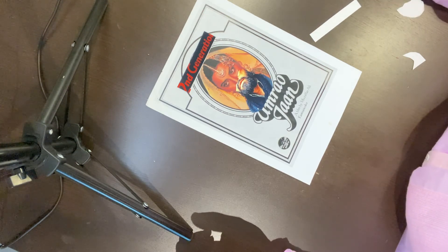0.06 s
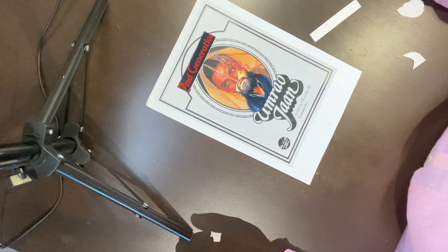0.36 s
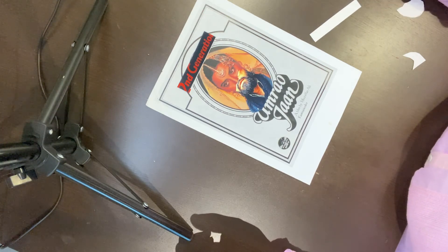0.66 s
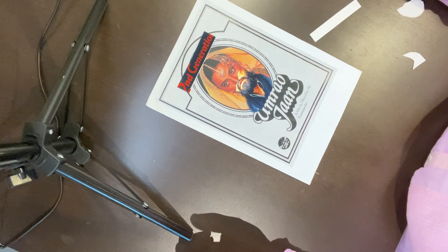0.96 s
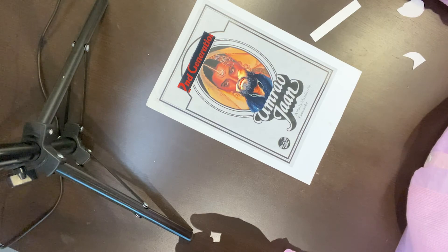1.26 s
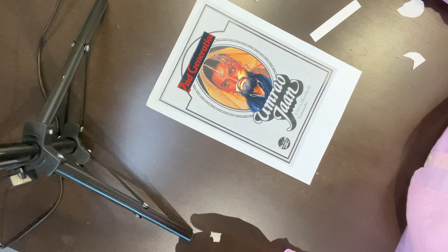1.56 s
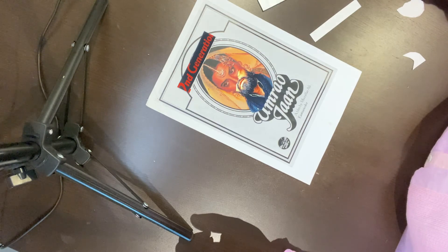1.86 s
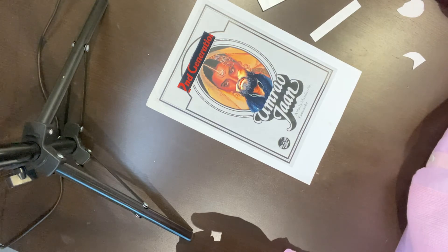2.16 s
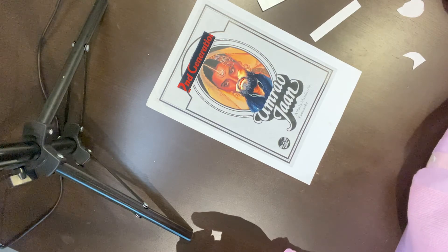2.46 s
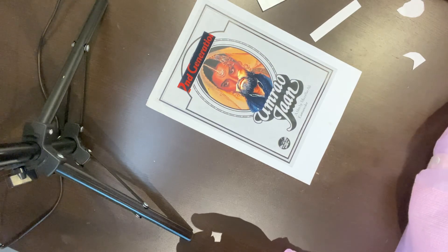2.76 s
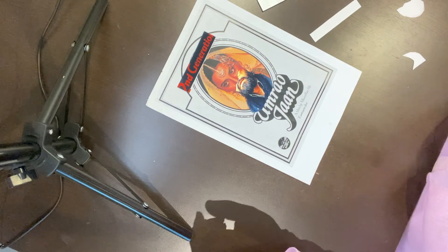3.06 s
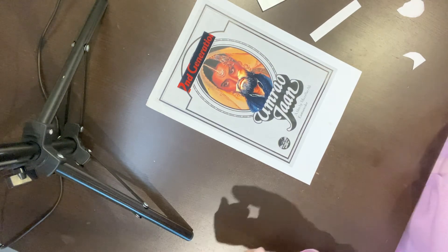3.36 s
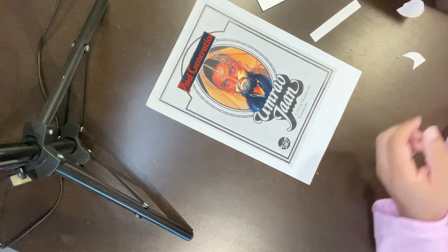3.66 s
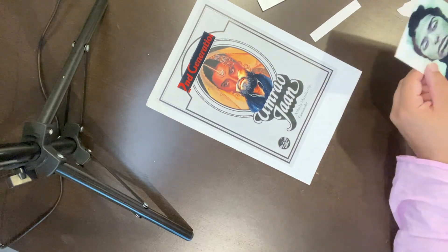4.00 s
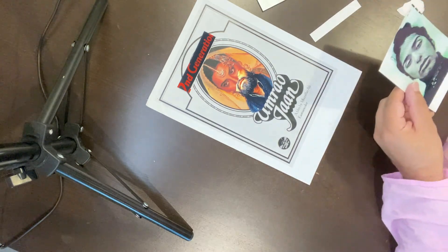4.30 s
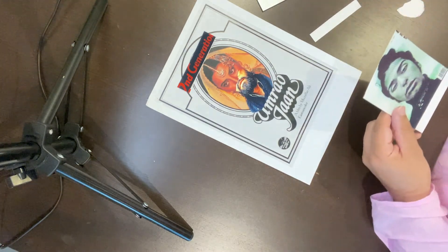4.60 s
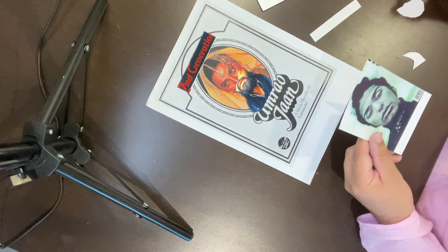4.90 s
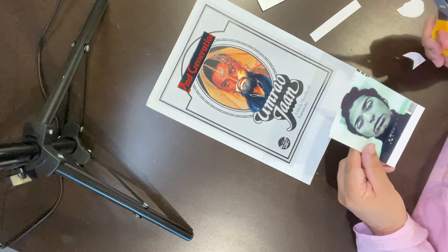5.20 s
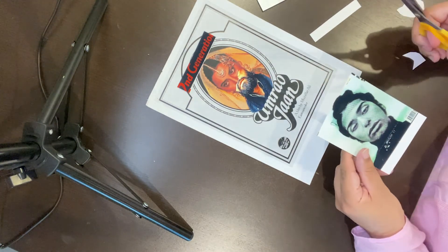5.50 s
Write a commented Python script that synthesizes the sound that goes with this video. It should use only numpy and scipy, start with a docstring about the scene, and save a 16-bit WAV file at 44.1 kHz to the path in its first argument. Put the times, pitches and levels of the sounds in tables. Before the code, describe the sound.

A fan hums steadily throughout in a small, bare room, with everything heard close up. At the very start a sheet of paper crackles briefly as it bends, and fingertips hiss softly across it around 0.7 seconds and again from 1.3 to 1.6. From about 2.1 seconds a sleeve rustles while scissors knock, skid and scrape on a wooden table, with thin squeaks near 2.6 and 3.2 seconds and a faint low rumble of an arm pushing on the tabletop. Scattered knocks continue until about 3.7 seconds. Between 4.2 and 4.6 seconds comes the loudest moment, a quick clatter of wooden thuds and ringing steel with short scrapes. The sleeve fades by about 4.8 seconds. From 5 seconds a photo glides over the sheet with a very faint, thin whistle, and near 5.5 seconds the scissor blades rub open.

```python
"""Paper craft at a table in a small, bare room, heard close up over the steady hum of a fan.
First a sheet crackles as it bends and fingertips hiss across it. From about 2 s a sleeve rustles along
while a photo is fetched, and scissors, put down and taken up again, skid, scrape and squeak over the
table. Their knocks ring wood and steel and peak in a clatter near 4.3 s. At the end the photo glides
over the sheet with a thin whistle and the blades rub open."""
import sys
import numpy as np
from scipy import signal
from scipy.fft import rfft, irfft
from scipy.io import wavfile

SR = 44100
rng = np.random.default_rng(int(sys.argv[2]) if len(sys.argv) > 2 else 0)


def wrap_up_sound(samples):
    """Save the sound to the file named by the first command line argument, as 16-bit audio."""
    columns = np.atleast_2d(samples).T
    # keep every value between -1 and 1, then stretch to whole-number steps
    tamed = np.clip(columns, -1, 1)
    steps = np.round(tamed * 32767).astype(np.int16)
    wavfile.write(sys.argv[1], SR, steps)


N = 244342
TIME = np.arange(N) / SR
FREQ = np.fft.rfftfreq(2 * N, 1 / SR)

# The room's tail. Each row: frequency in Hz, time to fall 60 dB in seconds (each layer scales it).
ROOM_T60 = [(200, 0.56), (700, 0.24), (1800, 0.34), (3500, 0.41), (8000, 0.14), (15000, 0.062)]
# The stereo image. Each row: frequency in Hz, width in dB, left minus right in dB.
STEREO_IMAGE = [(60, -34, 0), (160, -22, 0), (330, -12, .5), (600, -5.5, .3), (1100, -1.5, 3.3),
                (2100, 2, 2.7), (3400, -2, -.5), (4300, -3, -.5), (5100, -18, 0), (7500, -6, 0),
                (10500, -17, 0), (13000, -4, 0)]
# The fan's motor lines. Each row: pitch in Hz, level in dB.
MOTOR_LINES = [(112, -63), (182, -65.5), (360.7, -61.5)]

# Tone colours. Each row: frequency in Hz, relative level in dB.
FAN_TONE = [(25, -72), (50, -34), (80, -4.5), (105, -0.5), (180, 0), (270, -6.5), (420, -10.5),
            (570, -12.5), (1170, -25), (2000, -27.5), (4000, -41), (6500, -56), (15000, -79)]  # the fan and the air of the room
BOOM_TONE = [(30, -51), (45, -51), (70, -22), (88, -6), (115, 12), (150, -9), (250, -21), (345, -2),
             (450, -1), (560, -1), (900, -29), (3000, -77)]  # the tabletop's low bending
SLEEVE_TONE = [(1500, -7), (3500, -12), (4500, 2.5), (5400, -5.5), (6500, 1.5), (8000, -1), (10500, -2),
               (12000, -4.5), (13200, -9), (14500, -18), (16000, -45)]  # cloth fibres
FINGER_TONE = [(1500, -44), (3400, -21.5), (4100, -6), (5500, -9.5), (6500, -2), (8000, -2.5), (9300, 0),
               (12000, -5), (14500, -12), (16000, -41)]  # skin on paper
FLEX_TONE = [(800, -35), (1500, -7), (2200, -2), (2850, 7), (3400, 7.5), (4000, 11), (6000, 7), (8000, -12),
             (14000, -43)]  # bending paper
SETTLE_TONE = [(800, -29), (1600, 0), (2000, 2.5), (2500, -13.5), (3500, -7), (4500, -15), (7000, -33),
               (14000, -51)]  # paper on the table
DRAG_TONE = [(200, -39), (620, -9), (800, 13.5), (1030, 9), (1290, 9), (1520, -0.5), (2200, 8),
             (2650, -1.5), (3300, 2), (4200, 1.5), (5400, -3.5), (9000, -18), (15000, -50)]  # a rough scrape
TICK_TONE = [(500, -35), (2000, -22), (3500, 8), (4500, 19), (5500, 14), (8000, -1.5), (12000, -13),
             (16000, -21)]  # a hard contact

# Resonances. Each row: frequency in Hz, bandwidth in Hz, relative level in dB.
PHOTO_EDGE_MODES = [(6230, 210, 8.5), (7500, 880, -3), (8900, 3700, -9.5), (11100, 670, 0)]
BLADE_MODES = [(1680, 270, -26), (1970, 117, 16.5), (2280, 660, 1.5), (3840, 71, -3), (4290, 290, 4.5),
               (7550, 200, -3), (8170, 400, -1.5), (11450, 310, -12), (12700, 650, -5.5), (13700, 500, -16)]
CHATTER_MODES = [(1252, 67, 1), (1383, 69, 3.5), (1800, 120, -10), (2002, 65, 0.5), (2150, 15, 2),
                 (2255, 42, -1.5), (2690, 28, -7), (3760, 45, -6.5), (4020, 49, -1), (4240, 83, -10),
                 (4550, 91, -7)]  # the scissors skidding
FRAME_MODES = [(936, 61, -10), (1416, 200, -3), (1694, 59, 2.5), (1876, 44, -7), (2816, 145, 0.5),
               (2956, 84, 1.5), (3230, 80, 3.5), (3384, 79, 1), (3500, 94, 1), (3940, 120, -4),
               (4780, 210, -8)]  # the scissors' frame
TABLE_MODES = [(381, 28, 2), (460, 58, 0), (584.7, 31, 7), (676, 18, 4), (696, 100, -5), (751, 54, 5),
               (822, 104, 2), (955, 29, 1), (1025, 42, 1.5), (1137, 60, -5), (1284, 20, 0), (1434, 34, -6),
               (1644, 110, -3), (1927, 130, 0.5), (2120, 210, -0.5), (2580, 240, 2), (2690, 260, 1.5),
               (3120, 240, -6), (3990, 100, -0.5)]

# Strokes. Each row: start in seconds, rise in seconds, hold in seconds, relative level in dB.
ARM_PUSHES = [(2.58, 0.038, 0.33, -51.5), (3.04, 0.045, 0.082, -56), (3.26, 0.13, 0.41, -60),
              (4.35, 0.015, 0.023, -41.5)]  # the arm pushes on the tabletop
PHOTO_GLIDES = [(2.1, .02, 0.055, -81), (4.97, 0.04, 0.052, -79), (5.12, 0.04, 0.067, -75.5),
                (5.23, 0.084, 0.048, -71)]  # the photo glides over the sheet
SLEEVE_BRUSHES = [(2.185, 0.041, 0.025, -61), (2.54, 0.026, 0.014, -71), (2.92, .04, .28, -59),
                  (3.28, 0.1, 0.29, -55), (3.56, 0.15, 0.2, -60), (3.86, 0.061, 0.29, -61.5),
                  (4.1, 0.082, 0.27, -62.5), (4.19, 0.032, 0.49, -64.5), (4.78, 0.0044, 0.055, -71)]  # the sleeve follows the arm
FINGER_STROKES = [(0.0, 0.0047, 0.02, -58), (.095, 0.0052, 0.0046, -71), (.631, 0.0035, .003, -69.5),
                  (.668, 0.024, 0.05, -50), (1.263, 0.027, 0.027, -59), (1.3, 0.043, 0.025, -55.5),
                  (1.405, 0.023, 0.046, -57.5), (1.54, 0.011, 0.03, -67)]  # fingers stroke the paper
SHEET_BENDS = [(0.003, 0.022, 0.018, -45)]  # the sheet bends
SHEET_SETTLES = [(.1, 0.065, 0.31, -70.5)]  # it rubs faintly on the table
BLADE_STROKES = [(5.462, 0.057, .05, -43.5)]  # the blades open
SKIDS = [(2.606, 0.033, 0.11, -37)]  # the scissors skid

# Creases snapping. Each row: time in seconds, peak level in dB.
CREASES = [(0.018, -44), (.029, -53), (.047, -46), (0.107, -45.5)]
# Thin friction squeaks. Each row: start and length in seconds, first and last pitch in Hz, level in dB.
SQUEAKS = [(2.644, 0.1, 1398, 1369, -37), (2.633, 0.11, 4046, 3985, -46), (2.915, 0.177, 3330, 3310, -58),
           (3.15, 0.15, 3526, 3530, -52), (4.223, 0.21, 14400, 14190, -59), (4.35, 0.2, 14000, 12900, -66)]
# Scissors and photo dragged over the table. Each row: start, rise and hold in seconds, then relative
# levels in dB of the scrape, the scissors' ring and the hiss.
DRAGS = [(2.181, 0.018, 0.075, -55, -70, -81), (2.594, 0.066, 0.081, -51, -56.5, -50.5),
         (2.754, 0.064, 0.087, -47.5, -47, -49), (2.993, 0.051, 0.025, -39.5, -46, -52),
         (3.066, 0.019, 0.087, -45.5, -52.5, -54), (3.196, 0.085, 0.01, -60, -51.5, -52.5),
         (3.392, 0.041, 0.11, -70, -58.5, -74), (3.557, 0.048, 0.053, -53.5, -78, -75),
         (4.38, 0.019, 0.013, -39.5, -45, -57.5), (4.437, 0.022, 0.067, -47.5, -48, -60.5),
         (4.535, 0.032, 0.032, -40.5, -40.5, -51.5)]
# Blows on the table. Each row: time in seconds, thud level in dB, thud centre in Hz, thud width in
# octaves, levels of scissor ring, tick and scuff in dB, gap to the first bounce in seconds.
# Levels are relative; the scuff is set against its own thud.
KNOCKS = [(2.098, -48, 1600, 2, -52, -41, -18, 0.00045), (2.204, -7.5, 970, 1.77, -42, -60, -6.5, 0.00057),
          (2.383, -19, 1090, 0.57, -36, -88.5, -20, 0.0026), (2.613, -23.5, 1840, 0.37, -47, -25, 8, 0),
          (2.804, -21, 1000, 1.3, -9, -32, -3, 0), (2.85, -2.5, 950, 0.98, -22, -25, -8, 0.0007),
          (3.046, -10, 1025, 0.39, -15, -21, -12, 0.0002), (3.288, -16, 824, 1.14, 3, -15, 8.5, 0.00073),
          (3.363, -18, 1630, 1.11, -17, -27, -26, 0.0027),
          (3.631, -12.5, 1120, 0.99, -41, -45, -12, 0.00072), (3.641, -15, 1400, 1.3, -29, -38, -21, 0),
          (3.887, -40.5, 1339, 0.75, -57, -34.5, 6.5, 0.0034),
          (4.215, 1.5, 770, 1.64, -15, -47, -20, 0.0023), (4.233, -2, 580, 0.25, -36, -55, -30, 0),
          (4.249, -0.5, 670, 2.16, -26, -50, -11, 0), (4.347, 9.5, 880, 1.85, -3, -21, -23, 0.0026),
          (4.354, 2, 1150, 1, -13, -12, -25, 0), (4.363, 1, 640, 1.47, -20, -35, -29, 0.004),
          (4.405, -8, 1920, 1.4, -4.5, -14.5, -19, 0), (4.412, -5.5, 1500, 1.6, -21, -23, -28, 0.0051),
          (4.441, -5.5, 1562, 0.67, -24, -20, -22, 0.0039), (4.465, -16, 480, 0.46, -30, -42, -20, 0),
          (4.561, -12.5, 1860, 0.57, -21, -29, -2, 0.0086),
          (4.596, -8.5, 1670, 0.41, -35, -18.5, -4.5, 0.0044), (4.789, -66.5, 1710, 2.1, -66, -57, -7, 0)]

FOLD_BANDS_HZ = np.linspace(4000, 13000, 10)
# A stroke sags a little while held, then dies away at the rate of its material.
SAG_DB_PER_S = 11.5
PAPER_RELEASE_DB_PER_S, FLEX_RELEASE_DB_PER_S, CLOTH_RELEASE_DB_PER_S = 287, 314, 212
DRAG_RELEASE_DB_PER_S, STEEL_RELEASE_DB_PER_S, BOOM_RELEASE_DB_PER_S = 225, 140, 396


def undb(db):
    """Decibels to gain."""
    return 10 ** (np.asarray(db) / 20)


def unit(x):
    """Scale to rms 1."""
    return x / np.sqrt(np.mean(x ** 2))


def curve(points, column=1):
    """A smooth EQ curve in gain, drawn through a table's dB points over log frequency."""
    points = np.array(points)
    return undb(np.interp(np.log(FREQ + 1), np.log(points[:, 0]), points[:, column]))


def shape(x, response):
    """Filter by a frequency response."""
    return irfft(rfft(x, 2 * N) * response)[..., :N]


def resonances(modes):
    """Response of damped modes; neighbours swing in opposite directions."""
    return sum((-1) ** k * undb(db) * 1j * FREQ * width / (hz ** 2 - FREQ ** 2 + 1j * FREQ * width)
               for k, (hz, width, db) in enumerate(modes))


def unit_energy(x):
    """Scale a one-shot to energy 1."""
    return x / np.linalg.norm(x)


def add(track, s, sound):
    """Lay a sound into a track at s seconds."""
    i = int(s * SR)
    track[i:i + len(sound)] += sound[:N - i]


def wander(hz):
    """Smooth random modulation, changing about hz times a second."""
    return unit(shape(rng.standard_normal(N), np.exp(-FREQ / hz)))


def strokes(rows, release_db_per_s):
    """Envelope of a run of strokes: each swells, sags while held and dies away."""
    power = 0
    for s, rise_s, hold_s, db in rows:
        t = TIME - s
        sag_db = SAG_DB_PER_S * np.maximum(t - rise_s, 0)
        release_db = release_db_per_s * np.maximum(t - rise_s - hold_s, 0)
        power = power + (np.clip(t / rise_s, 0, 1) * undb(db - sag_db - release_db)) ** 2
    return np.sqrt(power)


def slips(rate, spread_db, smooth):
    """Friction: tiny catches of unequal size, about rate a second, over an even hiss of gain smooth."""
    catches = (rng.random(N) < rate / SR) * rng.choice([-1, 1], N)
    sizes = undb(spread_db * np.minimum(rng.exponential(size=N), 4))
    return unit(catches * sizes) + smooth * rng.standard_normal(N)


def rub(envelope, response, rate, spread_db, smooth):
    """Sliding contact heard through the body that it shakes."""
    return unit(shape(slips(rate, spread_db, smooth), response)) * envelope


def room(x, wet_db, decay=1, count=26000):
    """Direct sound plus dense wall echoes, different on each side; decay scales the tail's length."""
    t, hz = TIME[:count], np.fft.rfftfreq(count, 1 / SR)
    centres_hz, t60s = np.transpose(ROOM_T60)
    noise = rfft(rng.standard_normal((2, count)))
    tail = 0
    for weights, t60 in zip(np.eye(len(t60s)), t60s):
        band = np.interp(np.log(hz + 1), np.log(centres_hz), weights)
        tail = tail + irfft(noise * band) * undb(-60 * t / (t60 * decay))
    tail = tail * (1 - np.exp(-t / 0.00097))  # the echoes fade in
    impulse = undb(wet_db) * unit(tail) / np.sqrt(count)
    impulse[:, 0] += 1  # direct sound
    return signal.fftconvolve(x[None], impulse, axes=1)[:, :N] / np.sqrt(1 + undb(2 * wet_db))


def fan(air_db=-52, drift_hz=1.876):
    """The bed: a steady rush of air, with motor lines that waver in pitch and level."""
    air = unit(shape(rng.standard_normal((2, N)), curve(FAN_TONE)))
    hum = 0
    for hz, db in MOTOR_LINES:
        waver = wander(6.5)
        cycles = hz * TIME + drift_hz * np.cumsum(waver) / SR
        hum = hum + undb(db) * unit((1 + 0.14 * waver) * np.sin(2 * np.pi * cycles))
    return undb(air_db) * air + hum


def table_boom():
    """The low end: the tabletop bends under a push of the arm."""
    pushes = strokes(ARM_PUSHES, BOOM_RELEASE_DB_PER_S)
    return room(rub(pushes, curve(BOOM_TONE), rate=400, spread_db=3, smooth=1), wet_db=-8.5)


def photo():
    """The edge of the photo glides over the sheet with a thin whistle."""
    glides = strokes(PHOTO_GLIDES, PAPER_RELEASE_DB_PER_S)
    whistle = rub(glides, resonances(PHOTO_EDGE_MODES), rate=990, spread_db=2, smooth=0.73)
    return room(whistle * undb(1.3 * wander(20)), wet_db=3, decay=0.51)


def sleeve(fold_swell_db=2.2, fold_hz=9):
    """Cloth fibres catch in a fine rustle; as the folds shift, each band swells and fades on its own."""
    moves = SLEEVE_BRUSHES + [(s, rise, hold, hiss_db) for s, rise, hold, _, _, hiss_db in DRAGS]
    fibres = slips(rate=1800, spread_db=0.5, smooth=0.98)
    rustle = 0
    for band in np.eye(len(FOLD_BANDS_HZ)):
        colour = curve(SLEEVE_TONE) * np.interp(FREQ, FOLD_BANDS_HZ, band)
        rustle = rustle + shape(fibres, colour) * undb(fold_swell_db * wander(fold_hz))
    rustle = unit(rustle) * strokes(moves, CLOTH_RELEASE_DB_PER_S) * undb(1.1 * wander(39))
    return undb(2.5) * room(rustle, wet_db=-1, decay=0.27)


def sheet(snap_s=0.0027):
    """Paper crackles as it bends, snaps at its creases and rubs on the table as it settles."""
    bending = strokes(SHEET_BENDS, FLEX_RELEASE_DB_PER_S)
    crackle = rub(bending, curve(FLEX_TONE), rate=750, spread_db=1.5, smooth=0.83)
    snapping = sum(undb(db) * (TIME > s) * np.exp(-np.abs(TIME - s) / snap_s) for s, db in CREASES)
    snaps = rub(snapping, curve(FLEX_TONE), rate=4500, spread_db=-5.5, smooth=0.63)
    settling = strokes(SHEET_SETTLES, PAPER_RELEASE_DB_PER_S)
    brush = rub(settling, curve(SETTLE_TONE), rate=690, spread_db=4, smooth=0.55)
    return room(crackle + snaps + brush, wet_db=-13)


def fingertips():
    """Fingertips hiss over the sheet, the skin gripping and letting go."""
    stroking = strokes(FINGER_STROKES, PAPER_RELEASE_DB_PER_S)
    hiss = rub(stroking, curve(FINGER_TONE), rate=1000, spread_db=0.5, smooth=1)
    grip = undb(1.2 * wander(110))
    return undb(6) * room(hiss * grip, wet_db=0, decay=0.64)


def squeaks():
    """An edge sticks and slips at an unsteady, gliding pitch; each squeak swells and fades."""
    out = 0
    for s, length_s, first_hz, last_hz, db in SQUEAKS:
        progress = np.clip((TIME - s) / length_s, 0, 1)
        jitter_hz = (22 + 0.0054 * first_hz) * wander(124)
        pitch = first_hz + (last_hz - first_hz) * progress + jitter_hz
        flutter = 1 + 0.79 * wander(150)
        tone = unit(flutter * np.sin(2 * np.pi * np.cumsum(pitch) / SR))
        out = out + undb(db) * np.sin(np.pi * progress) * tone
    return room(out, wet_db=-1)


def sliding_steel():
    """The scissors chatter as they skid on the table, and blade rubs on blade as they open."""
    skidding = strokes(SKIDS, STEEL_RELEASE_DB_PER_S)
    chatter = rub(skidding, resonances(CHATTER_MODES), rate=780, spread_db=0.5, smooth=0.52)
    opening = strokes(BLADE_STROKES, STEEL_RELEASE_DB_PER_S)
    blades = rub(opening, resonances(BLADE_MODES), rate=2800, spread_db=-7, smooth=0.9)
    return room(undb(-1.5) * chatter + blades, wet_db=7)


def drags():
    """A rough scrape over the table: the grip comes and goes, and catches ring the scissors' frame."""
    grip = undb(2 * wander(37))
    scraping = strokes([(s, rise, hold, db) for s, rise, hold, db, _, _ in DRAGS], DRAG_RELEASE_DB_PER_S)
    ringing = strokes([(s, rise, hold, db) for s, rise, hold, _, db, _ in DRAGS], DRAG_RELEASE_DB_PER_S)
    scrape = rub(scraping, curve(DRAG_TONE), rate=600, spread_db=2.5, smooth=0.33)
    frame = rub(ringing, resonances(FRAME_MODES), rate=500, spread_db=2.5, smooth=0.24)
    return room(grip * (scrape + frame), wet_db=-1, decay=0.44)


def contacts(s, gap_s, graze_s=0.0045, shrink=0.77):
    """One blow as (seconds, dB): a graze, the hit and, if the gap tops 3 ms, two shrinking bounces."""
    touches = [(s - graze_s, -15), (s, 0)]
    if gap_s > 0.003:
        touches += [(s + gap_s, -9.5), (s + gap_s * (1 + shrink), -11.5)]
    return touches


def knocks(tick_s=0.0019, scuff_s=0.0058, spot_db=2, count=2400):
    """Each blow rings tabletop and scissors; a hard contact adds a tick, a glancing one a scuff."""
    metal = unit_energy(irfft(resonances(FRAME_MODES))[:8192])
    modes = np.array([(-1) ** k * irfft(resonances([mode]))[:count * 3]
                      for k, mode in enumerate(TABLE_MODES)])
    thuds, rings, ticks = np.zeros((3, N))
    t = TIME[:count]
    for start, thud_db, centre_hz, octaves, ring_db, tick_db, scuff_db, gap_s in KNOCKS:
        # each thud rings the table's modes within its own centre pitch and width
        edges_hz = centre_hz * 2 ** (octaves * np.array([-0.5, 0.5]))
        band = signal.butter(2, edges_hz, "band", fs=SR, output="sos")
        spot = undb(spot_db * rng.standard_normal(len(modes)))  # each spot favours other modes
        thud = unit_energy(signal.sosfilt(band, spot @ modes))
        for s, db in contacts(start, gap_s):
            scuff = unit_energy(rng.standard_normal(count) * t * np.exp(-t / scuff_s))
            force = undb(scuff_db) * scuff
            force[0] += 1  # the clean hit ahead of the scuff
            add(thuds, s, undb(db + thud_db) * signal.fftconvolve(thud, force))
            add(rings, s, undb(db + ring_db) * metal)
            tick = unit_energy(rng.standard_normal(count) * np.exp(-t / tick_s))
            add(ticks, s, undb(db + tick_db) * tick)
    return (undb(-1.5) * room(thuds, wet_db=0.5, decay=0.85)
            + undb(-2.5) * room(rings, wet_db=-2.5)
            + room(shape(ticks, curve(TICK_TONE)), wet_db=-6, decay=0.9))


def scene():
    """The mix: the low bed, the soft handling sounds and the scissors on top."""
    bed = fan() + table_boom()
    handling = photo() + sleeve() + sheet() + fingertips()
    scissors = squeaks() + sliding_steel() + drags() + knocks()
    return bed + handling + scissors


def record(dry, left_lag_samples=4.2, top_hz=15000):
    """Stereo image: widest in the midrange, the left a touch late; a low-pass cuts above 15 kHz."""
    mid = (dry[0] + dry[1]) / 2
    side = shape((dry[0] - dry[1]) / 2, curve(STEREO_IMAGE))
    lean = np.sqrt(curve(STEREO_IMAGE, column=2))  # half of the tilt goes to each side
    lag = np.exp(-2j * np.pi * FREQ * left_lag_samples / SR)
    left = shape(mid + side, lean * lag)
    right = shape(mid - side, 1 / lean)
    high_cut = signal.ellip(8, 0.2, 70, top_hz, fs=SR, output="sos")
    return signal.sosfilt(high_cut, np.array([left, right]))


dry = scene()
out = record(dry)
wrap_up_sound(out)
```